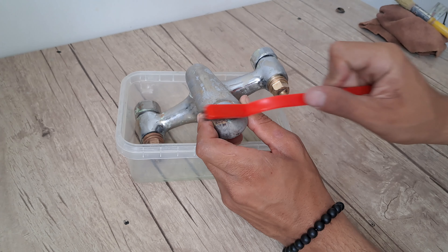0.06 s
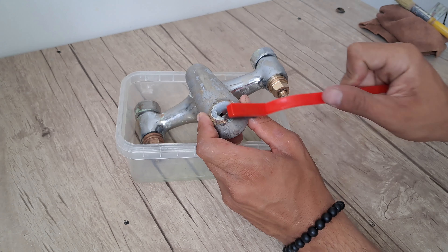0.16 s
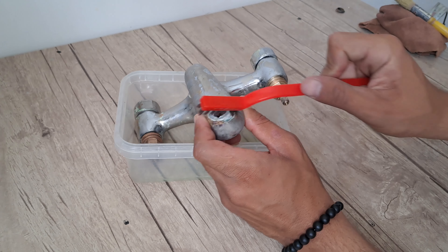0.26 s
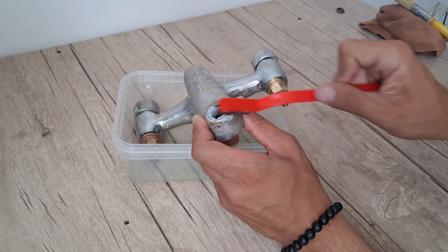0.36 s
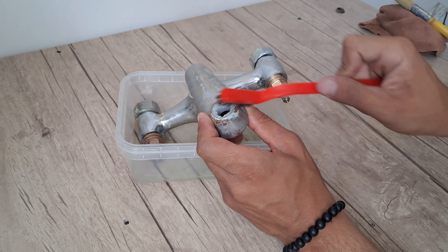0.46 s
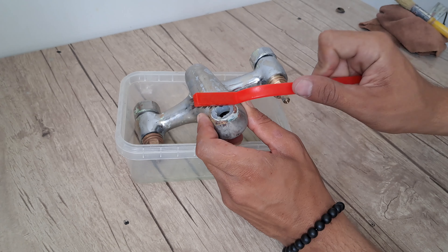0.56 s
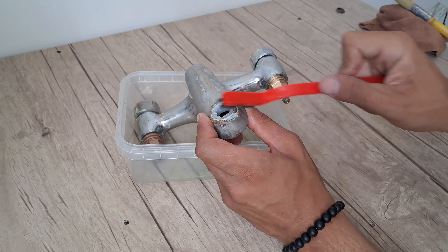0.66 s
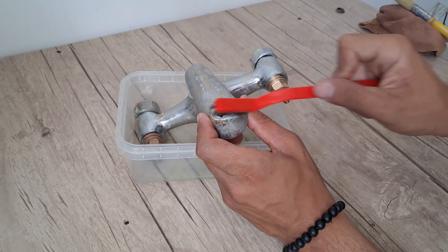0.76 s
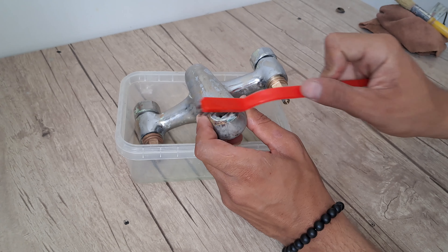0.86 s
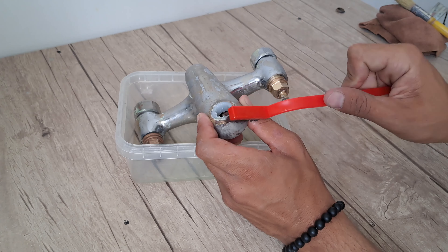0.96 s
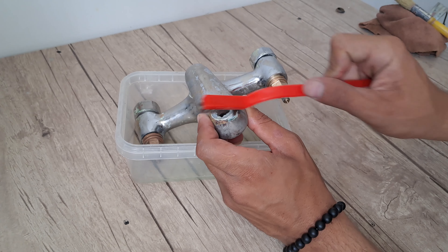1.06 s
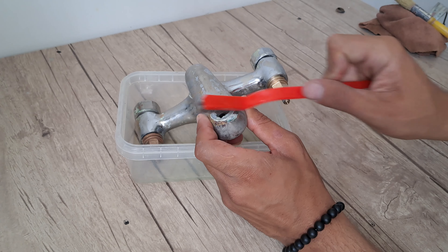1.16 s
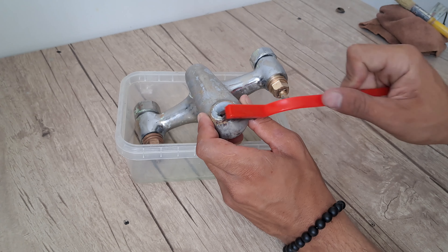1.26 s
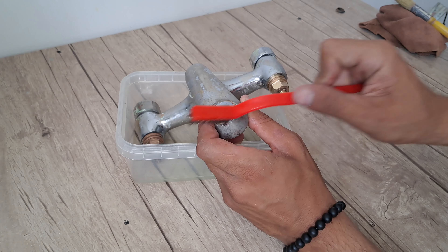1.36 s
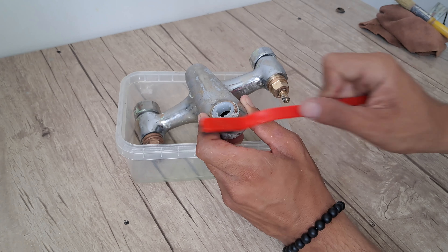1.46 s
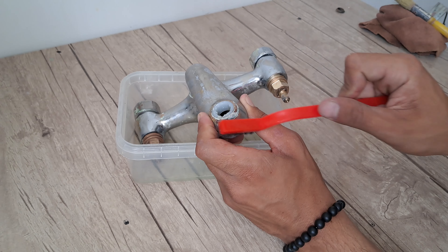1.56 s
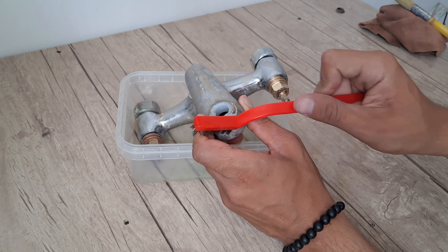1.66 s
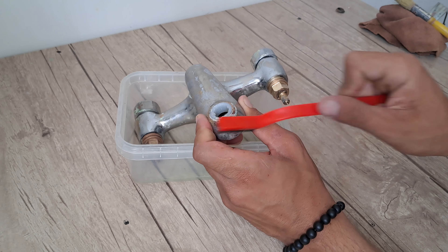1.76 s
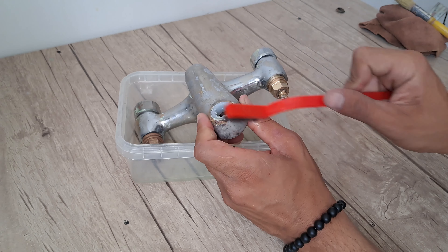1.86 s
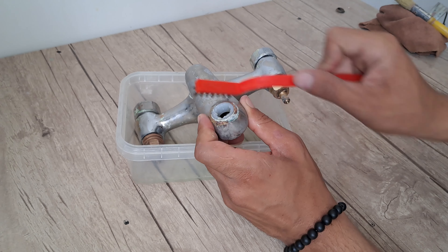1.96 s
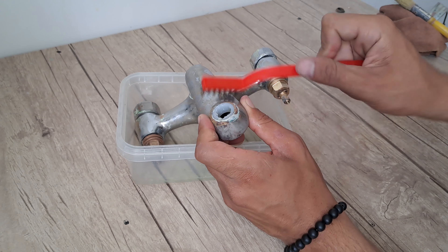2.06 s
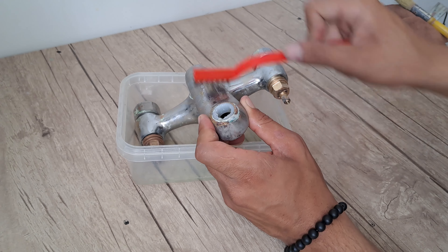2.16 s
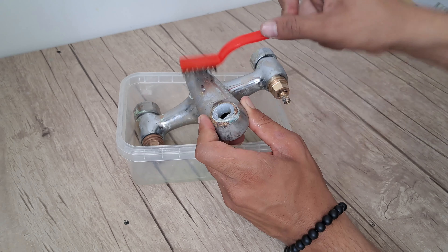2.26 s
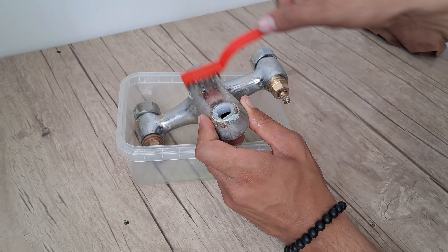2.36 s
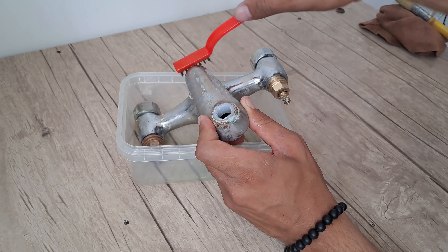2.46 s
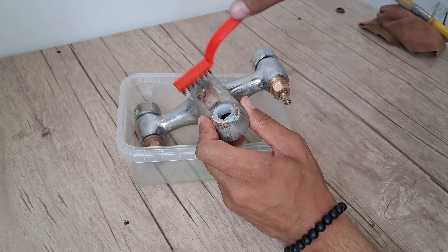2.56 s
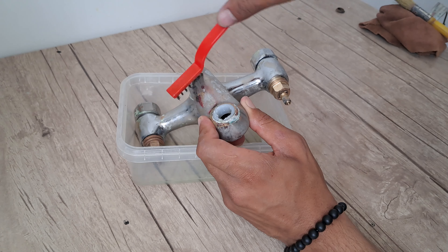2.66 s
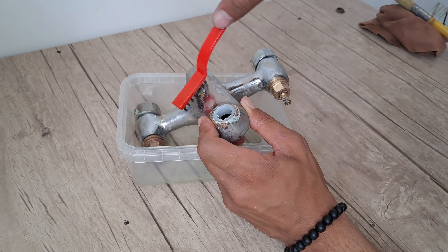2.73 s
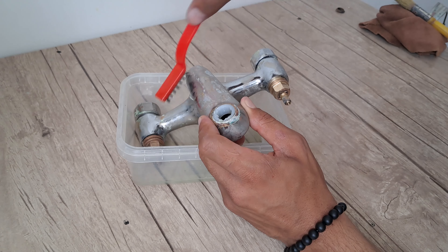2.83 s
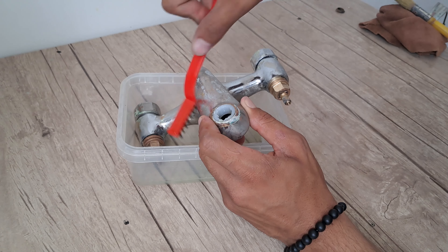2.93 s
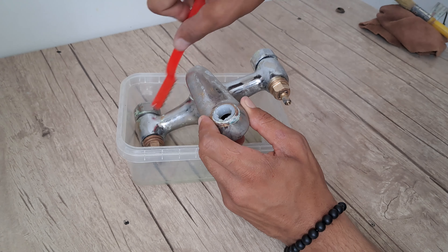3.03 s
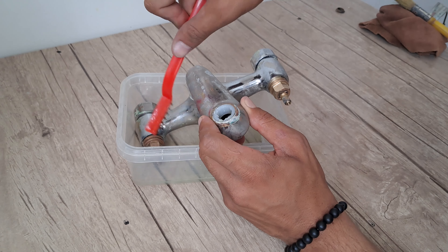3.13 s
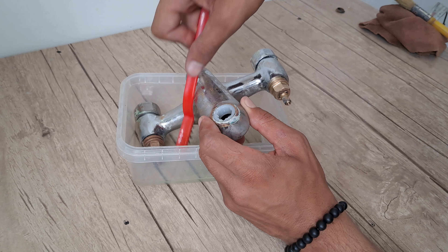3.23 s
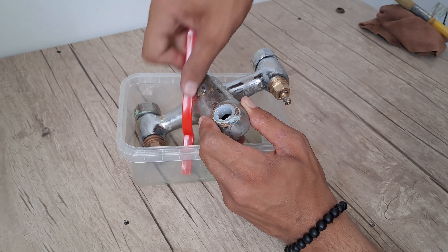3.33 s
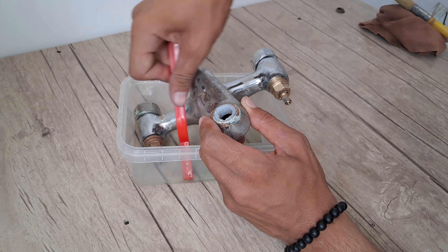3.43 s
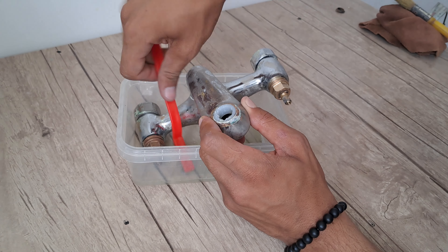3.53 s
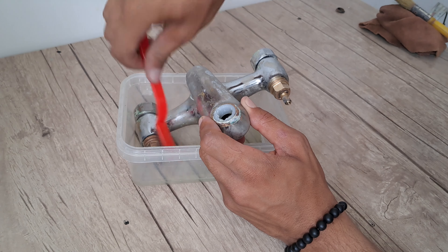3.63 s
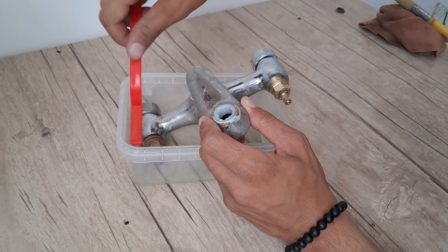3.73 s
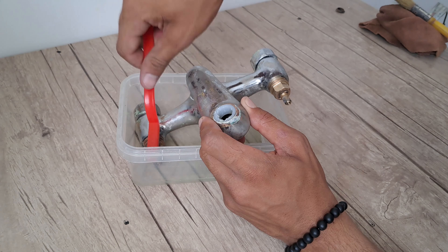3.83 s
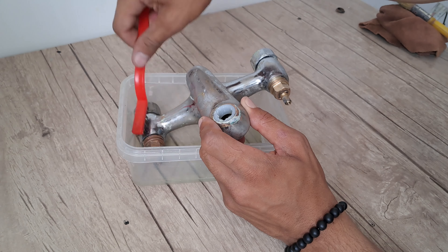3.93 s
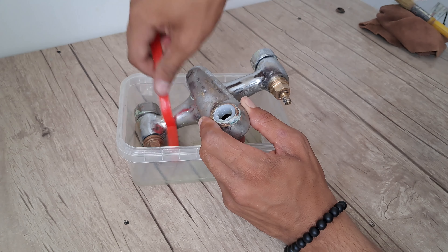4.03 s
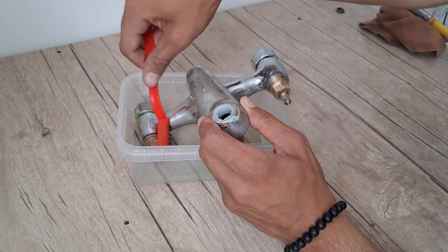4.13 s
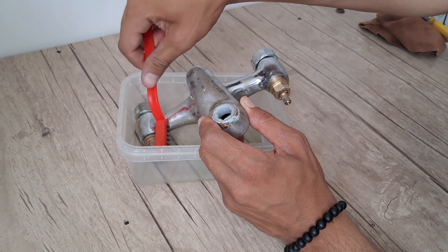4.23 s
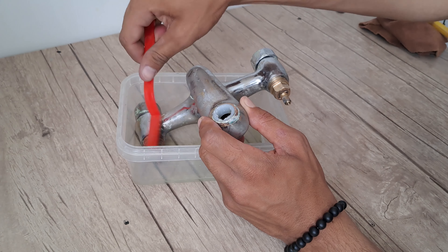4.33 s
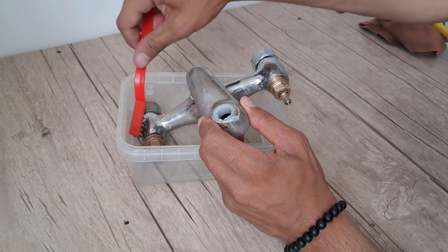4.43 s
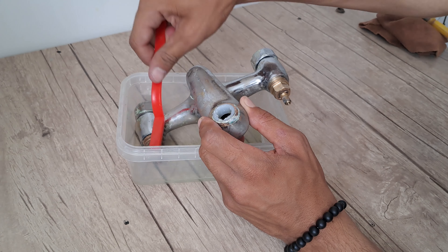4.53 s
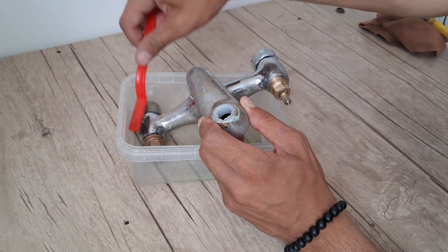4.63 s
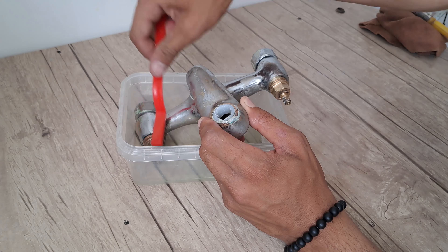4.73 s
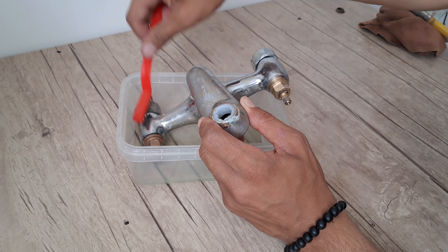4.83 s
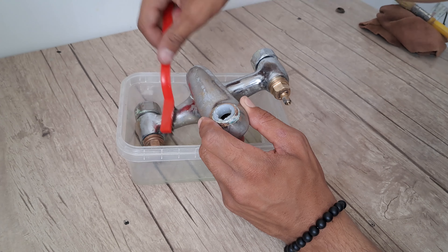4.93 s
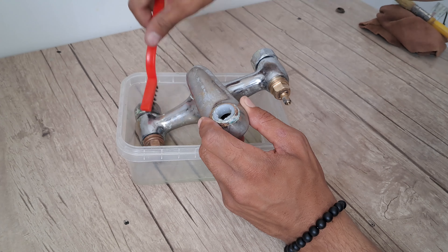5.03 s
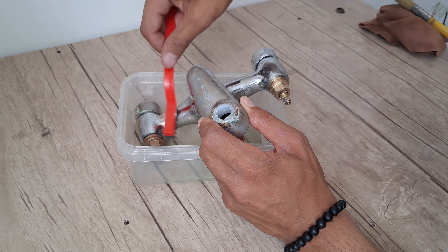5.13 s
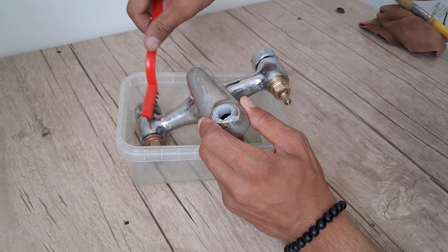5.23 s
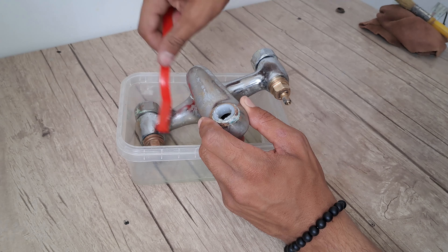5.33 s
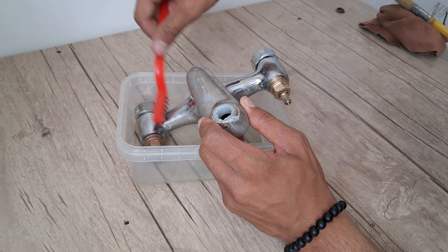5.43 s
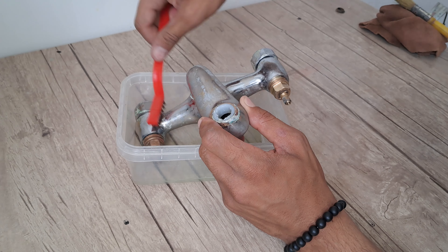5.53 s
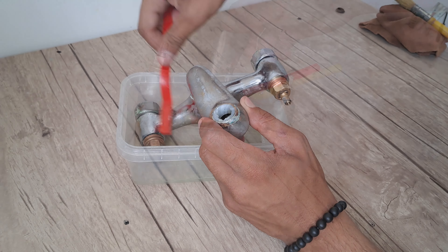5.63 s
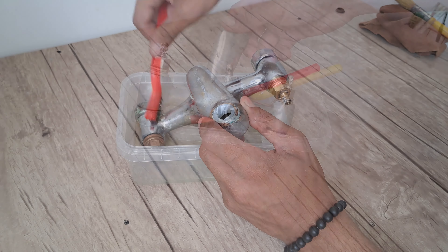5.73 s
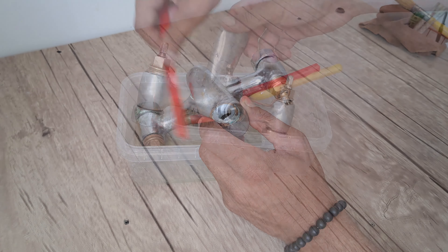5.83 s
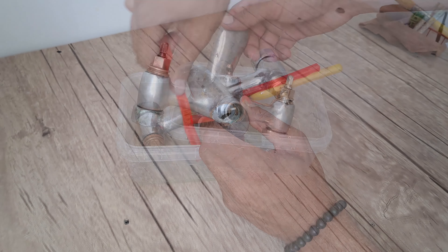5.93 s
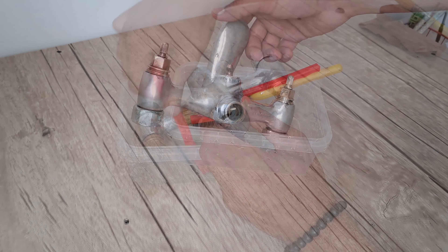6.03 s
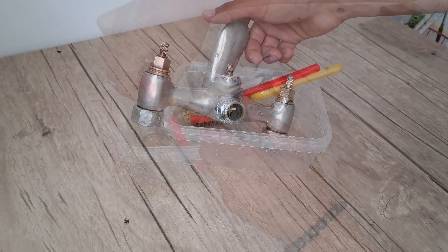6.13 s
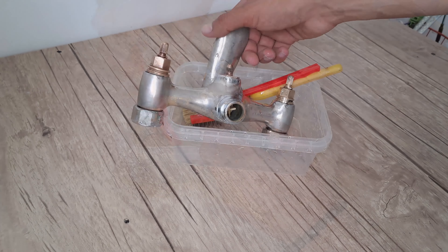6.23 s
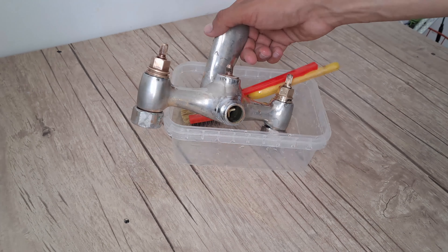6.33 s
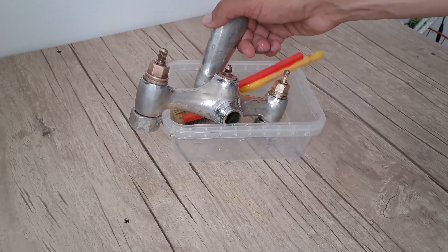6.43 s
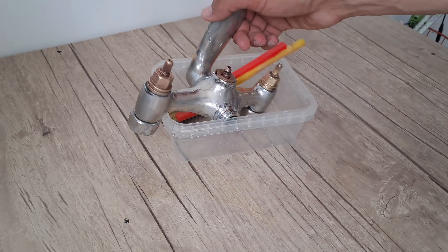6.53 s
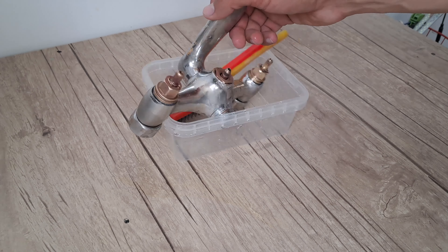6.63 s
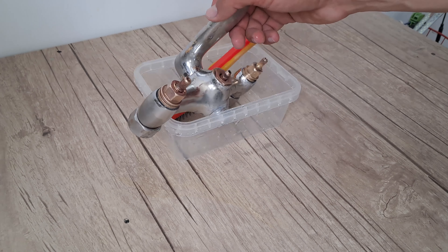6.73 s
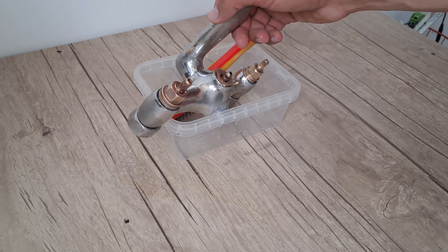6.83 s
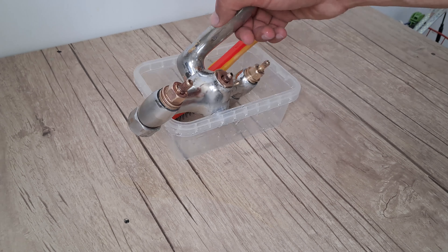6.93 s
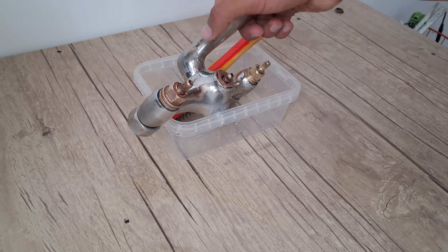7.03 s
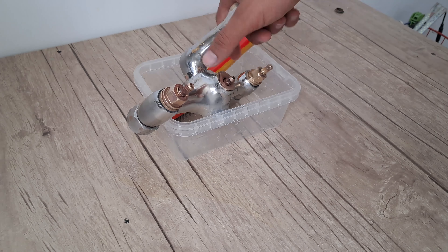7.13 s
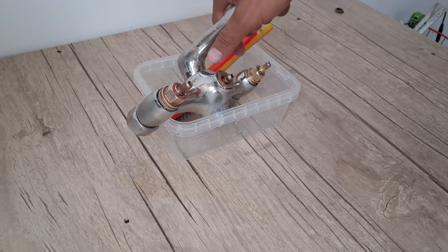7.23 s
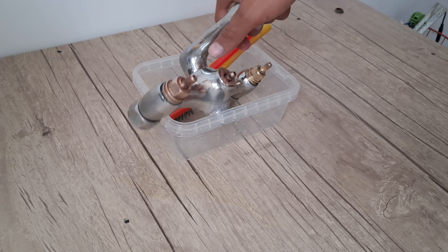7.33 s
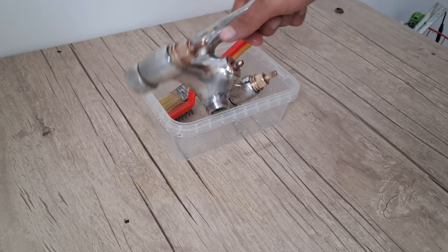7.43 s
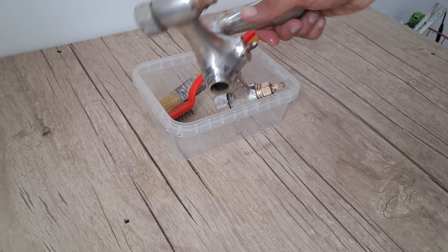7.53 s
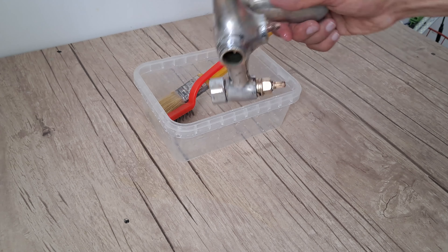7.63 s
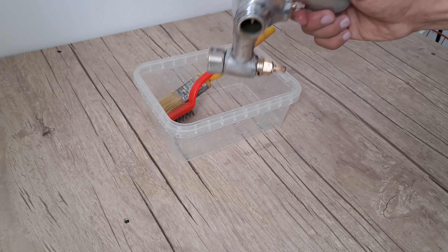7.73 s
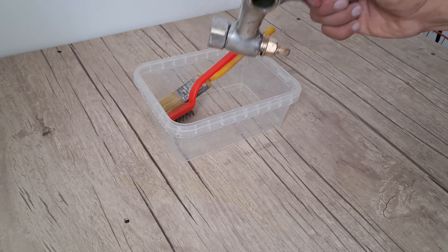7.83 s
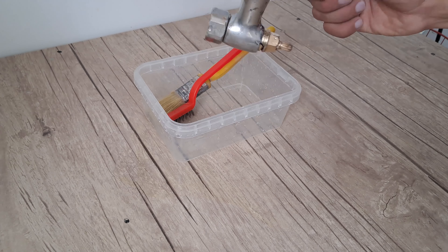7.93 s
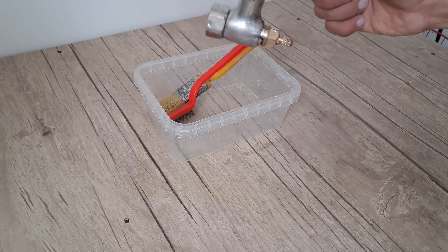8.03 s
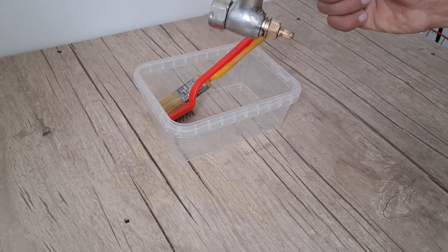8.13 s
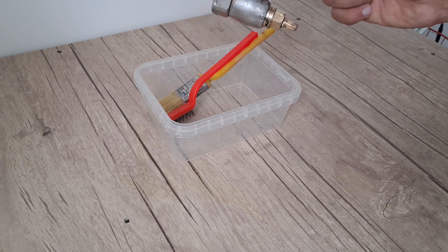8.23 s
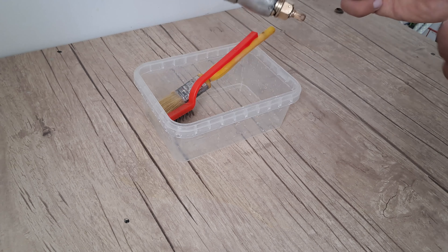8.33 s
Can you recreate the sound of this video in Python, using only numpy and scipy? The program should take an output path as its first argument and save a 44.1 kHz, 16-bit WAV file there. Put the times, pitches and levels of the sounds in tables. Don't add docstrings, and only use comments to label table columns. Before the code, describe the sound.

Close up in a small room, bristles patter scratchily over hollow metal in uneven back-and-forth strokes. The brush pauses, its back knocking metal and plastic, and scrapes on again with a sharp knock and a tiny squeak. The scrubbing stops, leaving faint air noise; a plastic tub scrapes along a wooden table, bumps again, and a lifted faucet's loose parts clink lightly.

```python
import sys
import numpy as np
from scipy import signal
from scipy.fft import rfft, irfft, next_fast_len
from scipy.io import wavfile
from scipy.ndimage import uniform_filter1d, map_coordinates

SR = 44100
rng = np.random.default_rng(int(sys.argv[2]) if len(sys.argv) > 2 else 0)


def wav_out(sig):
    wavfile.write(sys.argv[1], SR, np.round(np.clip(np.atleast_2d(sig).T, -1, 1) * 32767).astype(np.int16))


def magnitude_from_level(level_db):
    exponent = np.asarray(level_db, float) / 20
    return 10 ** exponent


N = 369558
MOVE_S = 3.4
SCENE_CHANGE_S = 5.955


def unit(x):
    return x / np.sqrt(np.mean(x ** 2) + 1e-20)


def at_hz(points, hz):
    points = np.array(points)
    return np.interp(np.log(hz + 1), np.log(points[:, 0] + 1), points[:, 1])


def at_time(points, **ends):
    return np.interp(np.arange(N) / SR, *np.transpose(points), **ends)


def coloured(x, spectrum):
    size = next_fast_len(N)
    gain = magnitude_from_level(at_hz(spectrum, np.fft.rfftfreq(size, 1 / SR)))
    return unit(irfft(rfft(x, size) * gain, size)[..., :N])


def grains(per_s, spread_db):
    sizes = magnitude_from_level(spread_db * np.minimum(rng.exponential(1, (2, N)), 5))
    signed = sizes * rng.choice([-1, 1], (2, N))
    return unit(signed * (rng.random((2, N)) < per_s / SR) + 1e-9)


def flutter(hz):
    r = np.exp(-64 * np.pi * hz / SR)
    noise = rng.standard_normal(N // 32 + 1001)
    slow = signal.lfilter([1], [1, -2 * r, r * r], noise)[1000:]
    return np.interp(np.arange(N) / 32, np.arange(len(slow)), unit(slow))


def resonance(x, hz, width_hz):
    r = np.exp(-np.pi * width_hz / SR)
    return unit(signal.lfilter([1, 0, -1], [1, -2 * r * np.cos(2 * np.pi * hz / SR), r * r], x))


def band(low_hz, high_hz):
    return signal.butter(3, [low_hz, high_hz], "band", fs=SR, output="sos")


MODE_WANDER_DB, WANDER_HZ = 2.2, 14


def rumble(modes):
    jolts = grains(1100., spread_db=3.0) * magnitude_from_level(1.5 * flutter(hz=23.4))
    out = 0
    for k, (hz, width_hz, db) in enumerate(modes):
        ring = resonance(resonance(jolts, hz, 1.83 * width_hz), hz, 1.83 * width_hz)
        out = out + (-1) ** k * magnitude_from_level(db + MODE_WANDER_DB * flutter(WANDER_HZ)) * ring
    return unit(out)


# f/Hz, likeness (0..1)
LIKENESS = [(40, 0.55), (120, 1), (300, 0.97), (700, 0.65), (2000, 0.3), (4000, 0.5), (7000, 0.33),
            (12000, 0.3)]
# f/Hz, level/dB
BALANCE_DB = [(60, 1.5), (180, 0.0), (550, -0.5), (1650, -1.0), (4970, -2.0), (15000, 0.0)]


def microphones(pair, lead_samples):
    size = next_fast_len(N + 2048)
    hz = np.fft.rfftfreq(size, 1 / SR)
    alike = np.clip(at_hz(LIKENESS, hz), 0, 1)
    shared, differing = rfft(pair, size)
    mid, side = np.sqrt(1 + alike) * shared, np.sqrt(1 - alike) * differing
    lag = 2 * np.pi * hz * lead_samples / SR
    tilt = magnitude_from_level(at_hz(BALANCE_DB, hz) / 2)
    return irfft([(mid + side) * tilt, (mid - side) * np.exp(-1j * lag) / tilt], size)[:, :N] / np.sqrt(2)


# f/Hz, density/dB
AIR = [(15, -43), (25, -13.5), (64, -8.5), (102, -5.5), (170, -13), (394, -20), (677, -27.5), (1020, -31),
       (4250, -36.5), (9320, -35), (11800, -37), (12300, -62)]


def air():
    return magnitude_from_level(-71) * coloured(rng.standard_normal((2, N)), AIR)


ROOM_T60_S, WALL_CUT_HZ = 0.3, 9800


def room(x):
    size = next_fast_len(N + SR)
    w = 2 * np.pi * np.fft.rfftfreq(size)
    dull = 1 / (1 + 1j * w * SR / (2 * np.pi * WALL_CUT_HZ)) ** 0.43
    out = np.zeros((2, len(w)), complex)
    for k, lag in enumerate((rng.uniform(.008, 0.027, 16) * SR).astype(int)):
        loop = magnitude_from_level(-60 * lag / SR / ROOM_T60_S) * dull * np.exp(-1j * w * lag)
        out[k % 2] += (-1) ** (k // 2) * loop / (1 - loop) / 4
    return irfft(out * rfft(x, size), size)[:, :N]


# t/s, level/dB
FAINT_HISS = [
    (7.68, -90),
    (7.74, -73),
    (7.9, -74),
    (8.0, -74),
    (8.12, -76),
    (8.2, -90),
]
# f/Hz, density/dB
FAINT_HISS_COLOUR = [(1500, -25), (2300, -10), (5700, -11), (7800, -20), (11000, -8), (15600, -4), (16400, -30)]


def faint_hiss():
    return magnitude_from_level(at_time(FAINT_HISS, left=-140, right=-140)) * coloured(grains(8000., spread_db=2.0), FAINT_HISS_COLOUR)


# start t/s, end t/s, from f/Hz, to f/Hz, level/dB
SQUEAK = (4.562, 4.642, 2150, 2560, -61)


def squeak():
    start, end, low_hz, high_hz, db = SQUEAK
    along = np.clip((np.arange(N) / SR - start) / (end - start), 0, 1)
    pitch_hz = low_hz + (high_hz - low_hz) * along + 22.0 * flutter(hz=150)
    turn = 2 * np.pi * np.cumsum(pitch_hz) / SR
    tone = np.sin(turn) + magnitude_from_level(-6.0) * np.sin(2 * turn)
    return magnitude_from_level(db + 3.5 * flutter(hz=60)) * np.sin(np.pi * along) * tone * [[1], [0]]


# start t/s, length/s, tub walls/dB, table top/dB, friction/dB
SLIDES = [(3.86, .05, -70, -70, -60), (3.93, .05, -70, -70, -55), (4.03, .04, -70, -70, -56),
          (4.5, .05, -70, -70, -61), (4.57, .07, -70, -70, -60), (4.68, .05, -46, -60, -52),
          (5.935, .015, -50, -50, -64), (6.8, .015, -62, -70, -70), (6.83, .015, -64, -70, -74),
          (2.845, .08, -60, -41, -62), (2.932, 0.106, -58, -45, -51), (3.048, 0.028, -40, -37, -46.5),
          (3.275, .07, -72, -56, -69), (3.363, .01, -38, -50, -56), (3.395, .025, -46, -54, -49),
          (3.5, .04, -62, -65, -61), (3.555, .05, -53, -63, -56), (3.6, .05, -39, -56, -44),
          (3.66, .02, -47, -58, -56), (3.455, .03, -62, -60, -60), (4.088, .05, -41, -55, -49),
          (4.43, .04, -48, -55, -52), (7.275, 0.022, -42, -39, -58), (7.311, 0.064, -52.5, -44, -68.5),
          (7.421, 0.01, -53, -52, -48), (7.58, .035, -33, -46, -53), (7.631, .04, -49, -47, -56)]
SLIDE_ATTACK_S, SWELL_SHARE = 0.0093, 0.4


def shifting(column, fade_db_per_s):
    t, power = np.arange(N) / SR, 1e-14
    for row in SLIDES:
        start, length = row[:2]
        rise = np.clip((t - start) / (SLIDE_ATTACK_S + SWELL_SHARE * length) + .5, 0, 1) ** 2
        fade_db = fade_db_per_s * np.clip(t - start - length, 0, 1)
        power = power + (rise * magnitude_from_level(row[column] - fade_db)) ** 2
    return np.sqrt(power)


# t/s, speed as level/dB
DRAG = [
    (6.29, -80),
    (6.335, -56),
    (6.365, -42),
    (6.4, -35),
    (6.46, -33),
    (6.53, -32.5),
    (6.64, -37),
    (6.735, -35),
    (6.77, -52),
    (6.82, -98),
]


def drag(offset_db):
    return magnitude_from_level(offset_db + at_time(DRAG, left=-140, right=-140))


# touch t/s, lift t/s
CONTACT = [
    (-0.01, 3.105),
    (3.846, 5.875),
]


def touching(hold_s, smooth_samples):
    t = np.arange(N) / SR
    down = sum((t > a) & (t < b + hold_s) for a, b in CONTACT)
    return uniform_filter1d(1. * down, size=smooth_samples)


# start t/s, reversal level/dB, stroke level/dB, shove on the support/dB
SPOUT_STROKES = [(0.0, -42, -43, -47.5), (0.082, -63.5, -43.5, -54.5), (0.213, -56.5, -45, -46),
                 (0.363, -51, -45, -48.5), (0.477, -48.5, -44.5, -45.5), (0.625, -53.5, -49, -51.5),
                 (0.767, -53, -45.5, -50.5), (0.932, -59, -45, -53), (1.033, -57.5, -45, -53.5),
                 (1.115, -50, -44, -54), (1.186, -64.5, -46, -54), (1.303, -57, -42, -49),
                 (1.471, -54, -50.5, -50), (1.602, -64, -51, -60.5), (1.74, -61, -56.5, -60.5),
                 (1.881, -60, -44.5, -59.5), (2.018, -53, -49, -58), (2.052, -58, -66, -64),
                 (2.1, -72, -58, -70), (2.15, -64, -56, -60), (2.19, -51, -43, -52), (2.232, -51, -47, -46),
                 (2.294, -61.5, -53, -55), (2.386, -57.5, -46.5, -62), (2.518, -60, -50, -54),
                 (2.609, -56, -49.5, -52), (2.727, -58.5, -53, -60), (2.785, -61, -53, -60),
                 (2.822, -48, -42.5, -50), (2.88, -50, -54, -52), (2.93, -60, -51, -60),
                 (2.975, -60, -55, -62), (3.018, -57, -49, -62), (3.052, -57, -54, -64),
                 (3.074, -57, -53, -66), (3.1, -66, -72, -72)]
VALVE_STROKES = [(3.827, -72, -52, -56), (3.893, -57, -46, -54), (3.996, -54, -46.5, -50),
                 (4.172, -69.5, -62, -67.5), (4.3, -77, -55.5, -75.5), (4.503, -71, -53, -50.5),
                 (4.593, -59.5, -46, -62), (4.717, -59.5, -49, -48), (4.787, -64, -48.5, -55.5),
                 (4.917, -55.5, -50.5, -54), (4.999, -56.5, -45.5, -44.5), (5.098, -59, -48, -49),
                 (5.185, -53, -46.5, -49.5), (5.279, -60, -47, -51), (5.366, -56.5, -46.5, -49),
                 (5.456, -59, -47.5, -53.5), (5.535, -59.5, -45, -41.5), (5.627, -61, -46.5, -51),
                 (5.715, -54, -45.5, -46), (5.822, -57.5, -57, -65)]
RISE_S, SPOUT_RISE_DB_PER_S, VALVE_RISE_DB_PER_S = 0.0061, 329, 550
HOLD_SHARE = 0.52


def stroke_db():
    start, turn_db, top_db, _ = np.transpose(SPOUT_STROKES + VALVE_STROKES)
    length = np.diff(start, append=start[-1] + .06)
    rate = np.where(start < MOVE_S, SPOUT_RISE_DB_PER_S, VALVE_RISE_DB_PER_S)
    rise = np.minimum(RISE_S + np.abs(top_db - turn_db) / rate, 0.59 * length)
    rest = np.clip(length - rise, .001, .16)
    times = np.ravel([start, start + rise, start + rise + HOLD_SHARE * rest], "F")
    levels_db = np.ravel([turn_db, top_db, top_db], "F")
    return np.interp(np.arange(N) / SR, np.maximum.accumulate(times), levels_db)


# f/Hz, width/Hz, level/dB
TABLE_TOP = [(70, 15, -9), (97, 13, -10), (124.5, 10.5, 0.5), (214, 65, -11)]
TUB_WALLS = [(218, 28, -6), (290.4, 22, 1.5), (355.8, 35, -1), (491.4, 45, -11)]
CAVITY = [(760, 73, 0.5), (837, 45, 1.5), (926, 71, -6)]
TUB_CORNER = [(175, 40, 0), (225, 50, -2), (520, 160, -14)]
# t/s, level/dB
NEAR_CAVITY = [
    (0, -9),
    (0.4, -6.5),
    (1.4, -7),
    (2.0, -9),
    (2.6, -27),
    (2.9, -32),
    (3.9, -21),
    (4.6, -21.5),
    (5.0, -31),
]
# t/s, level/dB
LEAN = [(0, -66), (.4, -63), (.9, -65), (1.4, -64), (1.75, -70), (2.15, -76), (2.2, -58), (2.26, -48),
        (2.33, -60), (2.45, -62), (2.6, -72), (3.1, -76)]
TUB_ON_SPOUT_DB, TUB_SWING = -16.5, 1.7
CAVITY_SWING = 0.45


def shaking():
    t, pressure_db = np.arange(N) / SR, stroke_db()
    mean_db = uniform_filter1d(pressure_db, size=5000)
    throb_db = pressure_db - mean_db
    start, shove = np.array(SPOUT_STROKES + VALVE_STROKES)[:, [0, 3]].T
    shove_db, on_spout = np.interp(t, start + 0.045, shove), t < MOVE_S
    table_db = np.where(on_spout, shove_db, mean_db) + 0.63 * throb_db
    spout_tub_db = -52.5 + TUB_ON_SPOUT_DB + TUB_SWING * (shove_db + 52)
    tub_db = np.where(on_spout, spout_tub_db, shove_db) + 1.05 * throb_db
    cavity_db = pressure_db + CAVITY_SWING * throb_db + at_time(NEAR_CAVITY)
    corner_db = at_time(LEAN, right=-140) + 0.6 * throb_db
    contact = touching(hold_s=.04, smooth_samples=1500)
    slid = shifting(column=3, fade_db_per_s=252) + drag(offset_db=-13)
    table = (contact * magnitude_from_level(table_db) + magnitude_from_level(-2.0) * slid) * rumble(TABLE_TOP)
    tub = magnitude_from_level(tub_db) * rumble(TUB_WALLS) + magnitude_from_level(corner_db) * rumble(TUB_CORNER)
    return table + contact * (tub + magnitude_from_level(cavity_db) * rumble(CAVITY))


# f/Hz, density/dB
SLIDE_COLOUR = [(590, -52), (1000, -24), (1560, -9), (2520, -10.5), (7060, -18), (8820, -21), (15100, -18),
                (15800, -36), (16400, -42)]
# t/s, level/dB
SLIDE_TREBLE = [
    (3.3, 0.5),
    (3.8, 7.5),
    (6.3, -0.5),
    (6.898, 6),
    (7.3, -7),
]
# f/Hz, width/Hz, level/dB
SHIFTED_TUB = [(192, 47, -6), (289, 45, 1), (362, 30, -1), (470, 50, -9)]
SHIFTED_RIM = [(720, 70, -4), (860, 70, 0), (1000, 80, 1), (1180, 110, -3), (1480, 150, -8),
               (1900, 200, -9)]
DRAGGED_TUB = [(192, 47, -4.5), (289, 55, 0.5), (367.5, 17.3, 1.5), (490, 50, 4), (580, 90, 4)]
DRAGGED_RIM = [(732, 55, -3.5), (870, 110, 0.5), (1020, 200, -5), (1320, 200, -10)]
RIM_DB, RIM_SWING = -48, 1.5
RIM_FREE_S = 3.04


def slides():
    hiss = coloured(grains(5400.0, spread_db=3.0), SLIDE_COLOUR)
    bright = signal.sosfilt(signal.butter(2, 4000, "high", fs=SR, output="sos"), hiss)
    hiss = (hiss + (magnitude_from_level(at_time(SLIDE_TREBLE)) - 1) * bright) * magnitude_from_level(1.3 * flutter(hz=40))
    grit = shifting(column=4, fade_db_per_s=597)
    walls = shifting(column=2, fade_db_per_s=498) * rumble(SHIFTED_TUB)
    walls += drag(offset_db=0) * rumble(DRAGGED_TUB)
    rim_gain = magnitude_from_level(RIM_DB) * (grit / magnitude_from_level(-48.5)) ** RIM_SWING * (np.arange(N) > RIM_FREE_S * SR)
    rim = rim_gain * rumble(SHIFTED_RIM) + drag(offset_db=-2.5) * rumble(DRAGGED_RIM)
    return magnitude_from_level(-4.0) * (walls + rim + (grit + drag(offset_db=-8)) * hiss)


# f/Hz, level/dB, t60/s
HELD = [(2854, -8.5, 0.05), (5180, 4, 0.029), (5550, -2, 0.059), (7970, -3, 0.11), (9700, -3, 0.032),
        (12700, -5, .05)]
LIFTED = [(1390, -13, .045), (1450, -14, .04), (2230, -6, .045), (2330, -6, .035), (2920, -8, .032),
          (3490, -6, .03), (5600, -1, .042), (5660, -5, .035), (6000, -4, .03), (7725, -14, .025),
          (8950, -10, .03), (9750, -5, .04), (4050, -16, .03), (11570, -13, .03)]
TUB_RIM = [(1420, -1, .03), (1650, -5, .025), (1950, -3, .025), (2350, 1, .03), (2930, -4, .03),
           (3300, -5, .025)]
# t/s, peak level/dB, treble re peak/dB, brass ring re peak/dB, note f/Hz
TAPS = [(1.702, -32, -9, -42, 2520), (2.0272, -39, 9, -20, 12700), (2.1087, -58, 6, -15, 12700),
        (2.2055, -38, 10, -13, 15200), (2.4908, -23, -12, -33, 2750), (2.493, -33, -12, -33, 1620),
        (2.829, -33, 2, -25, 5770), (2.9347, -29.5, 1.5, -8, 2680), (2.9825, -23.5, -12, -17, 2200),
        (3.0225, -31.5, 10, -10, 2860), (3.249, -28, -11, -17, 2900), (3.272, -42, -15, -20, 2700),
        (3.292, -45, -15, -20, 3000), (3.455, -50, -5, -25, 4000), (3.495, -48, 0, -25, 4100),
        (3.507, -49, 0, -25, 4200), (3.8514, -44.5, 4, -27, 890), (3.925, -35, -5, -19, 830),
        (4.7696, -42, 3, -20, 4600), (5.0742, -40, -3, -26, 4600), (5.5653, -44.5, 18, -23, 5050),
        (5.9149, -37, 15.5, -4, 6600), (7.3822, -31, -14, -30, 5500)]
# t/s, peak level/dB, bass re peak/dB, treble re peak/dB, note f/Hz
KNOCKS = [(3.0579, -29, 4, -6, 760), (3.3623, -29, 4, -5, 1700), (3.406, -42, 10, -18, 1320),
          (3.413, -42, 6, -18, 2000), (3.552, -55, 8, -15, 690), (3.576, -50, 8, -12, 760),
          (3.592, -44, 8, -12, 860), (3.612, -44, 4, -10, 1500), (3.631, -38, 10, -15, 1000),
          (3.645, -42, 4, -12, 2400), (4.0831, -21, -6, 7, 4200), (4.0885, -19, -3, -8, 2150),
          (4.4189, -32, 1, -2, 808), (4.446, -42, 0, -15, 2350), (4.462, -45, 0, -15, 2330),
          (4.6643, -14, -1, 2, 700), (4.699, -30, 6, -15, 780), (7.2639, -39, -8, -3, 2300),
          (7.2774, -37, -1, -12, 2270), (7.369, -54, 6, -20, 720), (7.4235, -33, 3, -4, 990),
          (7.431, -35, 0, -8, 1160), (7.455, -50, -3, -5, 2200), (7.5707, -30, 2, 0, 1150),
          (7.5832, -22, 6, -22, 930), (7.591, -33, 0, -20, 2400), (7.6354, -39, 7, -8, 1020)]
# t/s, peak level/dB, treble re peak/dB, note f/Hz
CLINKS = [(7.6787, -28, 8, 5500), (7.8347, -58, -14, 2950), (7.882, -72, 10, 9000),
          (7.9117, -60, -14, 5600), (7.926, -70, 8, 9900), (7.9493, -58, -14, 2250), (8.052, -37, 0, 6200),
          (8.062, -42, -2, 2900), (8.084, -50, -8, 5560), (7.9792, -29, 6, 5900), (8.0116, -34, -9, 2350),
          (8.0422, -30, 6, 5500), (8.1129, -29, 6, 5500)]
TAP_BASS_DB, CLINK_BASS_DB = -23, -60
KNOCK_RING_DB, CLINK_RING_DB = -11, 0.5


def blows():
    taps = [(s, db, TAP_BASS_DB, treble, ring, hz, HELD) for s, db, treble, ring, hz in TAPS]
    tub = [(s, db, bass, treble, KNOCK_RING_DB, hz, TUB_RIM) for s, db, bass, treble, hz in KNOCKS]
    clinks = [(s, db, CLINK_BASS_DB, treble, CLINK_RING_DB, hz, LIFTED) for s, db, treble, hz in CLINKS]
    return taps + tub + clinks


TAP_NOTE_DB, KNOCK_NOTE_DB = 7, 6.5
PULSE_DB, PULSE_CYCLES = -5, 4.0
MODE_SCATTER_DB = 2.5
HIGH_HZ = 6500
METAL_CRACK_LOW_HZ, PLASTIC_CRACK_TOP_HZ = 2000, 3300


def knocks():
    t = np.arange(SR // 6) / SR
    bass, treble = band(250, 1200), band(6000, 13500)
    loose = [bass, band(1200, 6000), treble]
    metal = [bass, band(METAL_CRACK_LOW_HZ, 6000), treble]
    plastic = [bass, band(1200, PLASTIC_CRACK_TOP_HZ), band(PLASTIC_CRACK_TOP_HZ, 13500)]
    no_bass = signal.butter(6, 1200, "high", fs=SR, output="sos")
    out = np.zeros((2, N + len(t)))
    for s, db, bass_db, treble_db, ring_db, note_hz, modes in blows():
        on_metal, on_tub = modes is HELD, modes is TUB_RIM
        noise, blow = rng.standard_normal((2, len(t))), np.zeros((2, len(t)))
        crack = plastic if on_tub else metal if on_metal else loose
        for sos, band_db, t60 in zip(crack, (bass_db, 0, treble_db), (.15, .09, .045)):
            fade = 1.1 * magnitude_from_level(-60 * t / 0.007) + 0.5 * magnitude_from_level(-60 * t / t60)
            level = magnitude_from_level(db + band_db - 13.0) / signal.sosfilt(sos, noise).std()
            blow += level * signal.sosfilt(sos, noise * fade)
        note_db = treble_db if note_hz > HIGH_HZ else TAP_NOTE_DB * on_metal + KNOCK_NOTE_DB * on_tub
        note = resonance(noise * magnitude_from_level(-60 * t / 0.06), note_hz, 0.07 * note_hz)
        blow += magnitude_from_level(db - 25.0 + note_db) * note * .25
        pulse_db = db + min(bass_db, 6.0) + PULSE_DB - 60 * t * note_hz / PULSE_CYCLES
        blow[0] += magnitude_from_level(pulse_db) * np.sin(2 * np.pi * note_hz * t)
        chatter = magnitude_from_level(db + ring_db - 30.0) * noise[::-1] * magnitude_from_level(-60 * t / 0.038)
        for hz, mode_db, t60 in modes:
            r, w = magnitude_from_level(-60 / (t60 * SR)), 2 * np.pi * hz / SR
            tilt_db = treble_db * (hz > HIGH_HZ and modes is LIFTED)
            scatter_db = MODE_SCATTER_DB * noise[0, int(hz) % 997]
            ring = signal.lfilter([0, np.sin(w)], [1, -2 * r * np.cos(w), r * r], chatter)
            blow += magnitude_from_level(mode_db + tilt_db + scatter_db) * ring
        out[:, int(s * SR):][:, :len(t)] += signal.sosfilt(no_bass, blow) if bass_db < -40 else blow
    return out[:, :N]


MOTTLE_DB, MOTTLE_S, MOTTLE_HZ = 3.0, 0.06, 200


def mottled(x):
    hz, s, cells = signal.stft(x, SR, nperseg=1024)
    coarse = rng.standard_normal((250, 400))
    where = np.meshgrid(hz / MOTTLE_HZ, s / MOTTLE_S, indexing="ij")
    patches = map_coordinates(coarse, where, order=1, mode="wrap")
    return signal.istft(cells * magnitude_from_level(MOTTLE_DB * 1.5 * patches - 1), SR, nperseg=1024)[1][:, :N]


# f/Hz, density/dB
ON_SPOUT = [(650, -15), (1100, -18), (2480, -8), (2970, -12), (3810, -4.5), (5000, -9.5), (7870, -11),
            (8510, -13.5), (12600, 1.5), (15500, -9), (16400, -33)]
ON_VALVE = [(410, -11), (700, -9), (1190, -25), (1670, -17), (2800, -15.5), (5860, -6.5), (6340, -5),
            (8590, -6), (12600, 2), (15600, 0), (16400, -32)]
# f/Hz, width/Hz, on spout/dB, on valve/dB
BRASS_HUM = [(4300, 380, -30, -34), (6000, 180, -32, -36.5), (7960, 60, -19, -26), (10200, 390, -36, -37),
             (11480, 450, -33, -20.5), (12650, 100, -19, -24), (14500, 120, -24, -27.5),
             (15000, 300, -12, -30.5)]
# t/s, level/dB
SINGING = [
    (1.9, -3),
    (2.15, 3),
    (2.45, 9),
    (2.93, 7),
    (3.8, -3),
]


def brush():
    on_spout = np.arange(N) / SR < MOVE_S
    pressure_db = stroke_db() + 2.4 * flutter(hz=44.4) + 1.1 * flutter(hz=150)
    pressure = magnitude_from_level(pressure_db) * touching(hold_s=0, smooth_samples=300)
    tips = grains(9000., spread_db=2.5)
    out = np.where(on_spout, coloured(tips, ON_SPOUT), coloured(tips, ON_VALVE))
    singing_db = at_time(SINGING)
    for hz, width_hz, spout_db, valve_db in BRASS_HUM:
        sings = 7000 < hz < 8500 or 12500 < hz < 13300
        wander_db = 4.0 * flutter(hz=9) + singing_db * sings
        out += magnitude_from_level(np.where(on_spout, spout_db, valve_db) + wander_db) * resonance(tips, hz, width_hz)
    return pressure * mottled(out)


ROOM_DB = -11.5
LEFT_LEAD_SAMPLES, LATER_LEAD_SAMPLES = 5.8, 1.2


def scene():
    near = magnitude_from_level(1.0) * brush() + shaking() + slides() + knocks() + squeak() + faint_hiss()
    after = np.arange(N) / SR - SCENE_CHANGE_S
    early, later = microphones(near, LEFT_LEAD_SAMPLES), microphones(near, LATER_LEAD_SAMPLES)
    heard = np.where(after < 0, early, later) + magnitude_from_level(ROOM_DB) * room(near[0])
    return heard * ((after < 0) | (after > .3)) + air()


def roll_off(x):
    return signal.sosfilt(signal.butter(12, 17070, fs=SR, output="sos"), x)


def record(dry):
    bass_cut = signal.butter(1, 40., "high", fs=SR, output="sos")
    top_cut = signal.cheby2(10, 30, 16150, fs=SR, output="sos")
    mix = signal.sosfilt(top_cut, signal.sosfilt(bass_cut, dry))
    return roll_off(mix)


dry = scene()
out = record(dry)
wav_out(out)
```